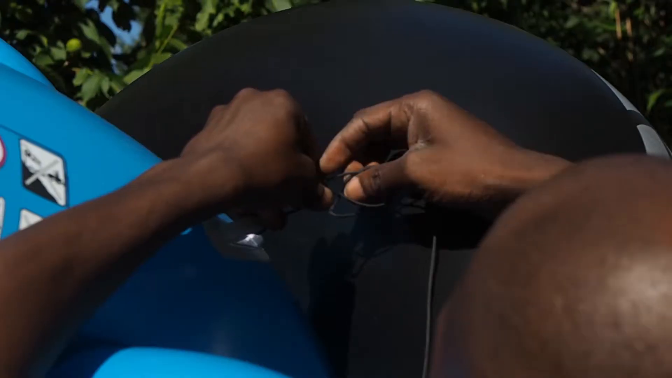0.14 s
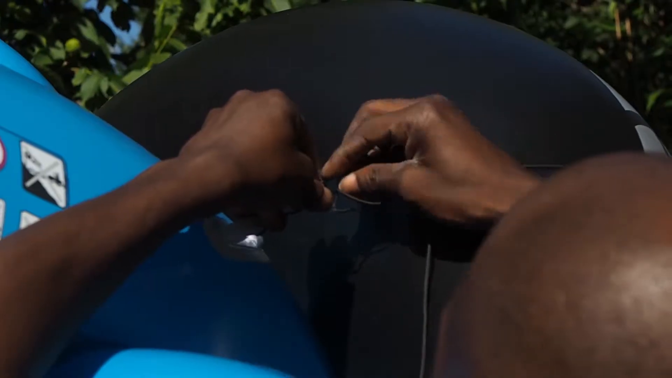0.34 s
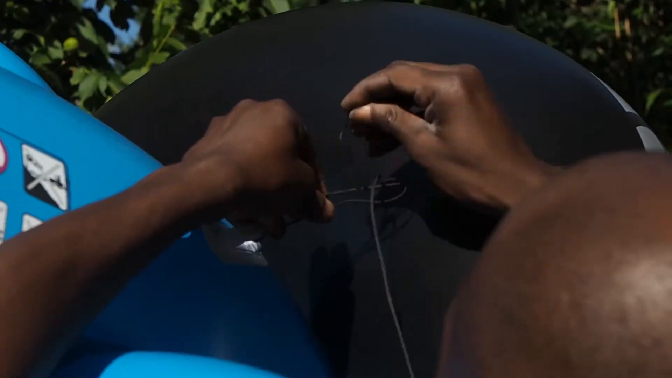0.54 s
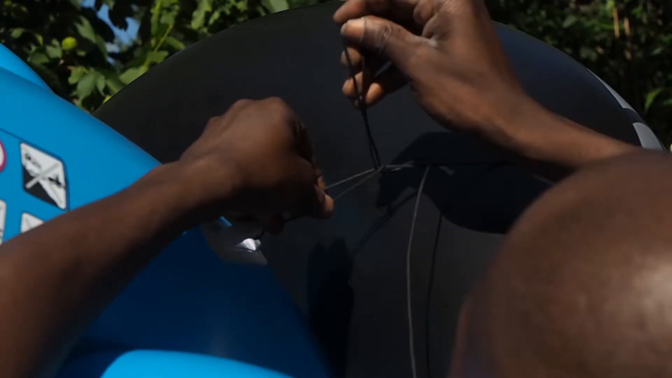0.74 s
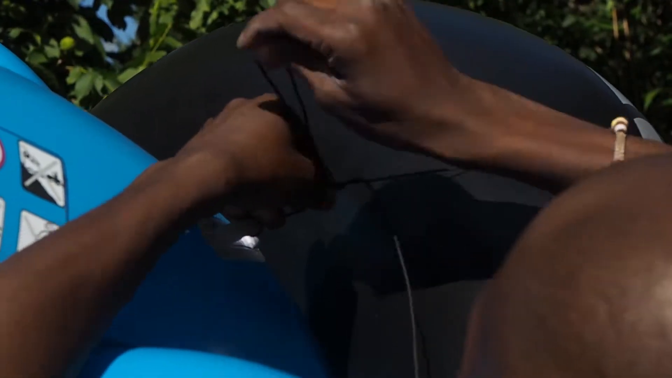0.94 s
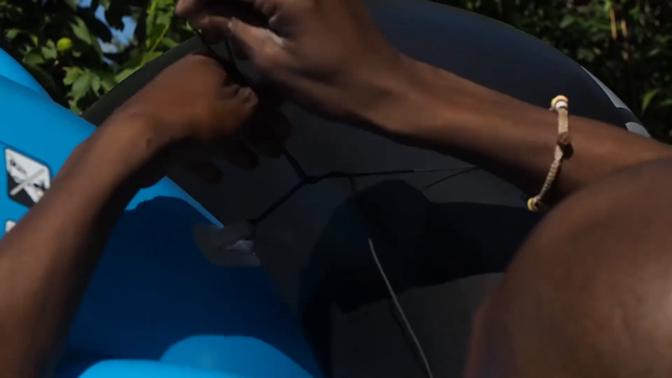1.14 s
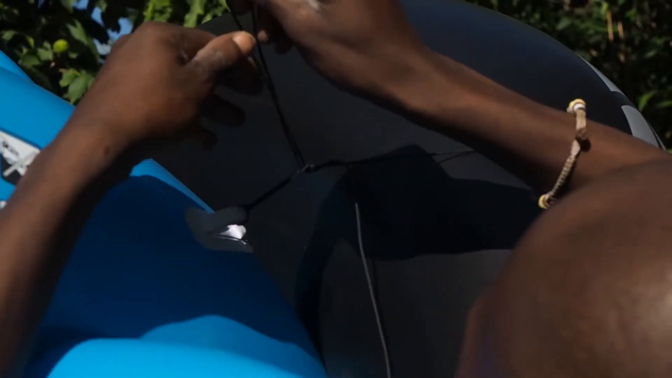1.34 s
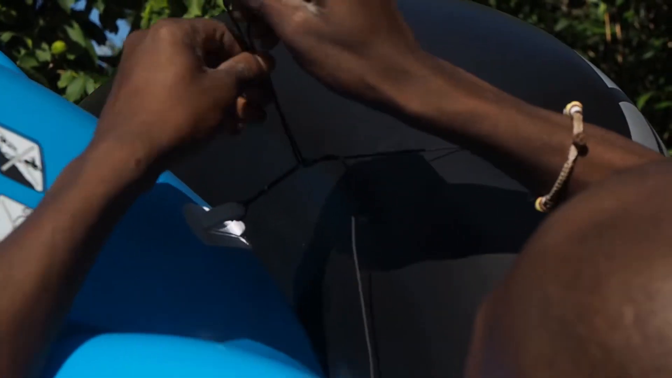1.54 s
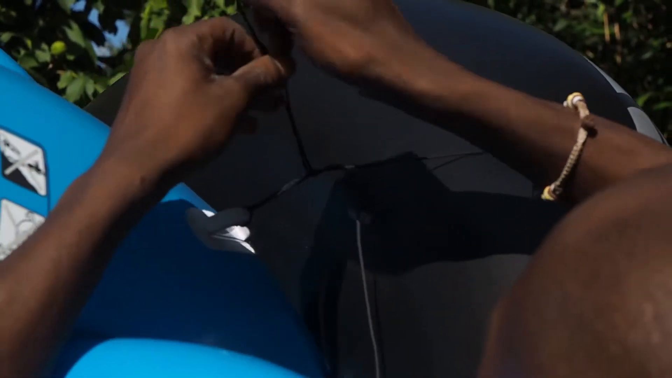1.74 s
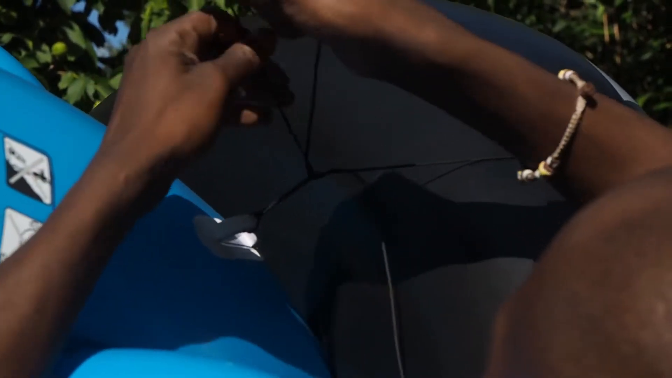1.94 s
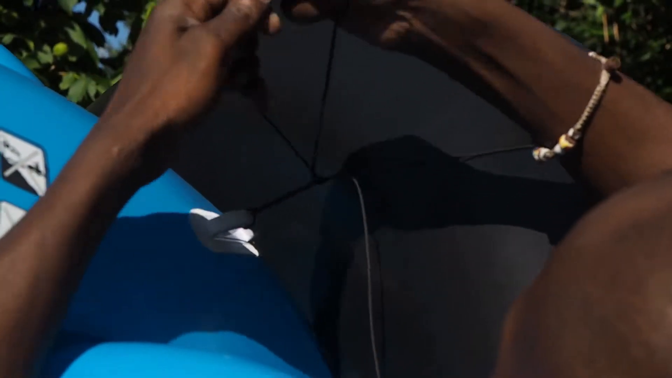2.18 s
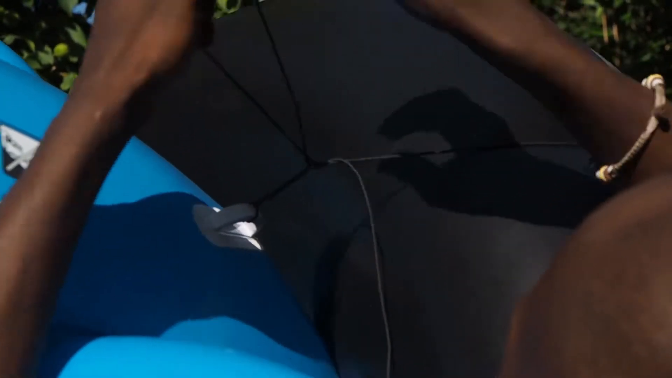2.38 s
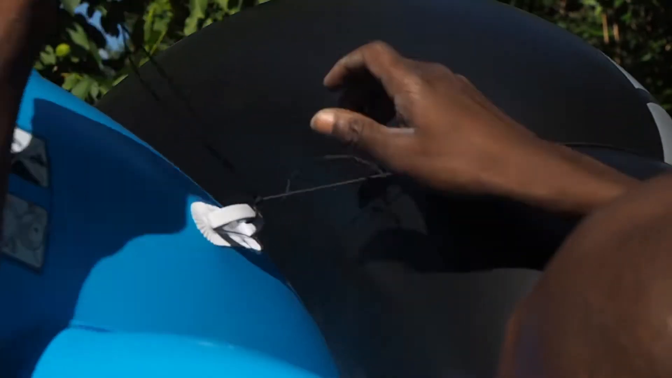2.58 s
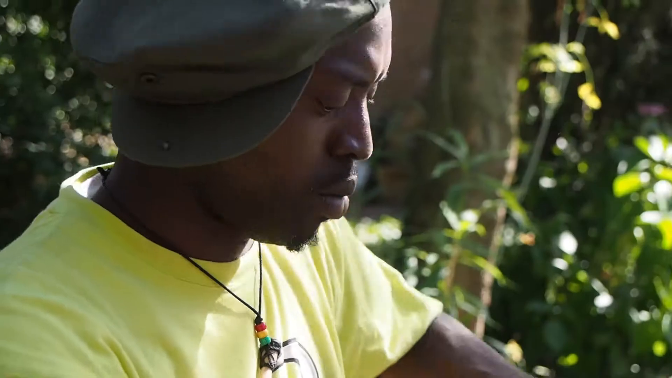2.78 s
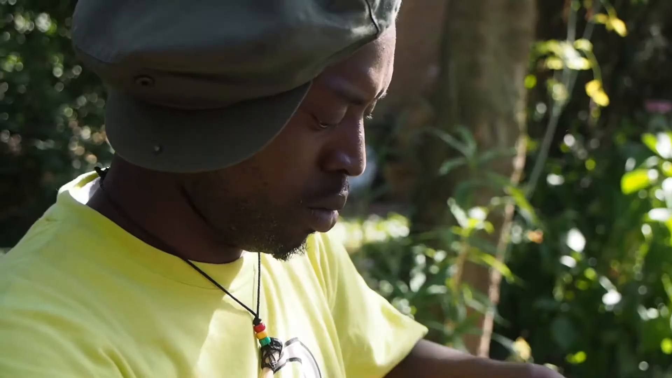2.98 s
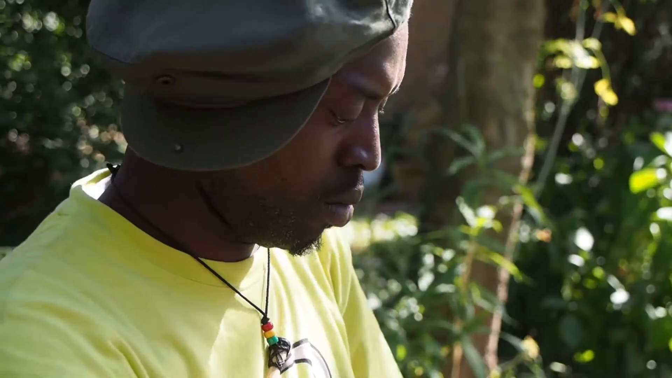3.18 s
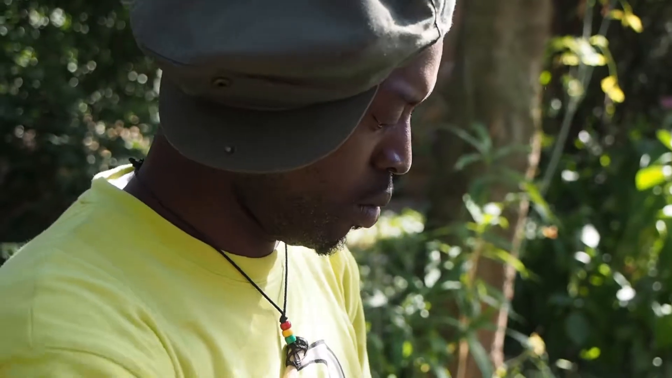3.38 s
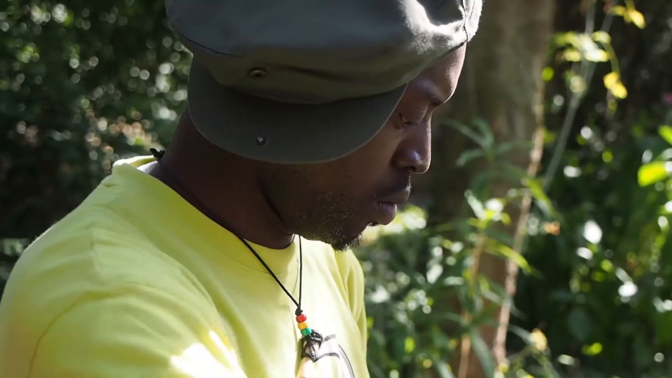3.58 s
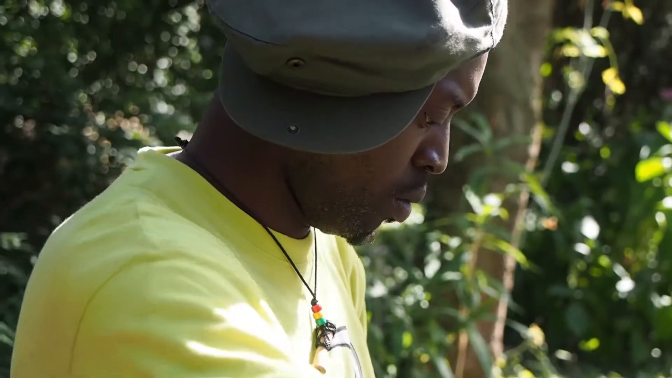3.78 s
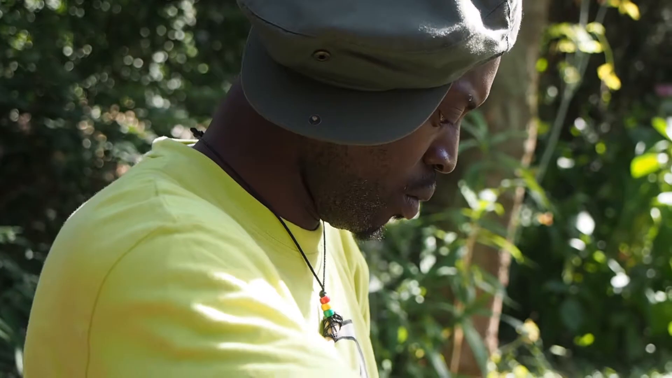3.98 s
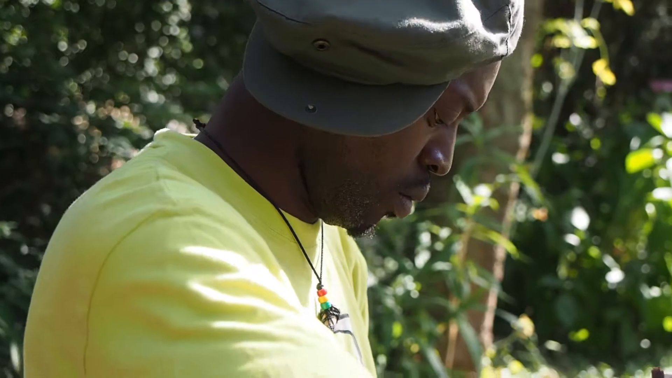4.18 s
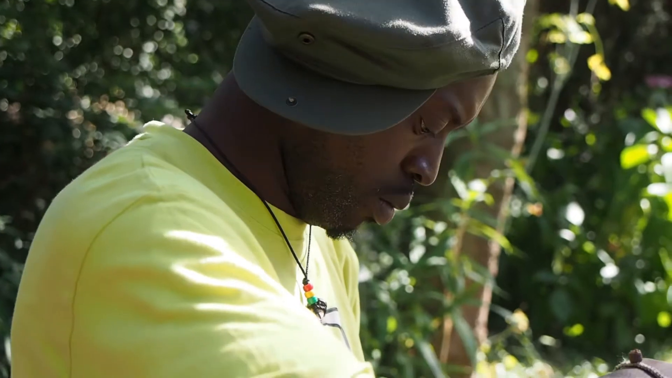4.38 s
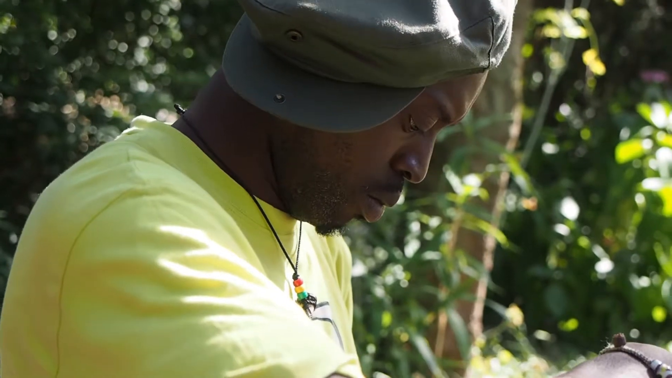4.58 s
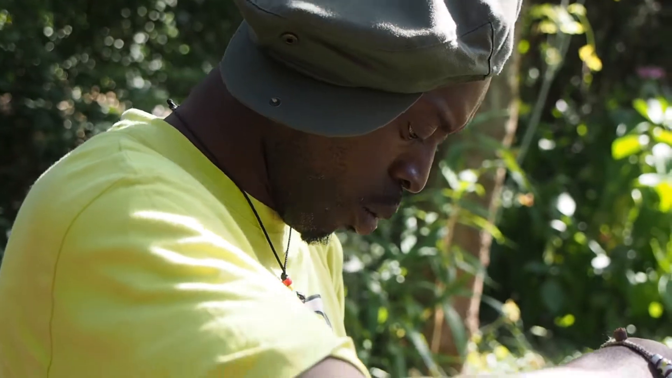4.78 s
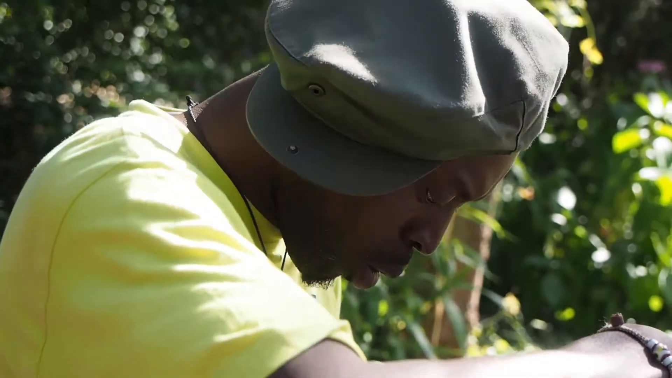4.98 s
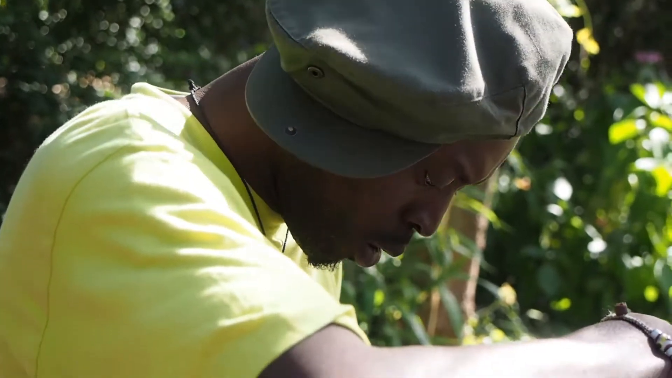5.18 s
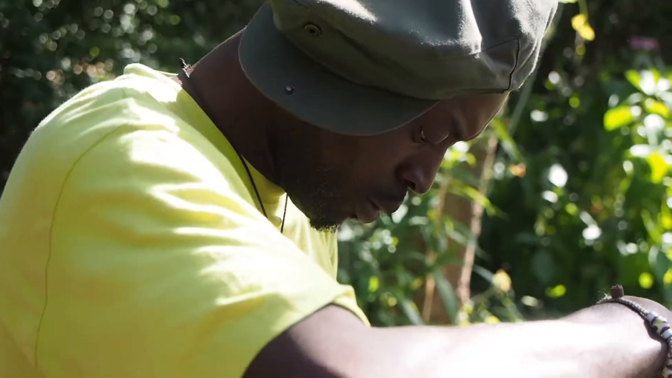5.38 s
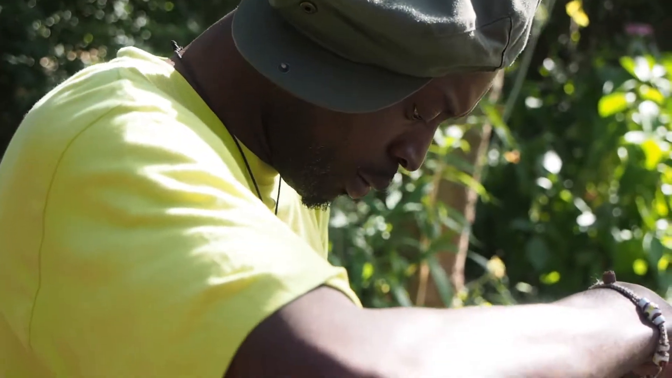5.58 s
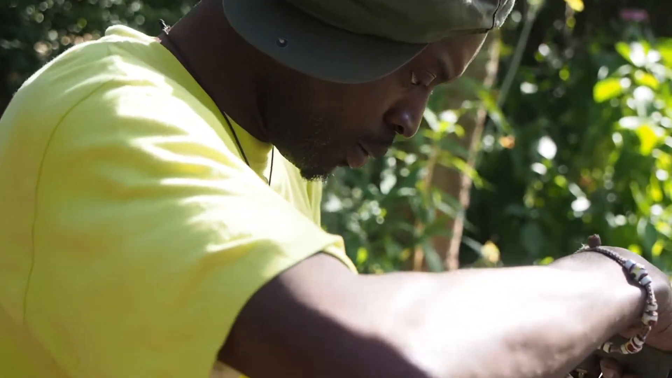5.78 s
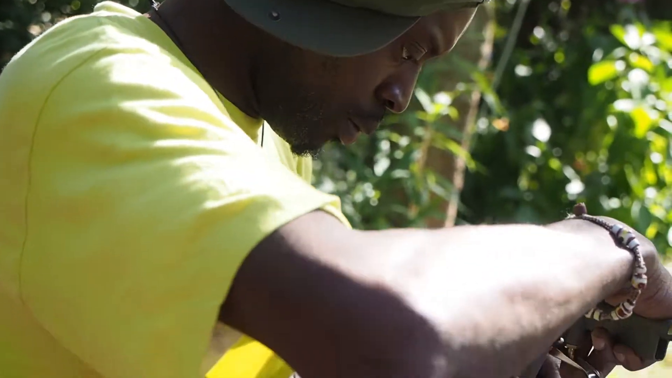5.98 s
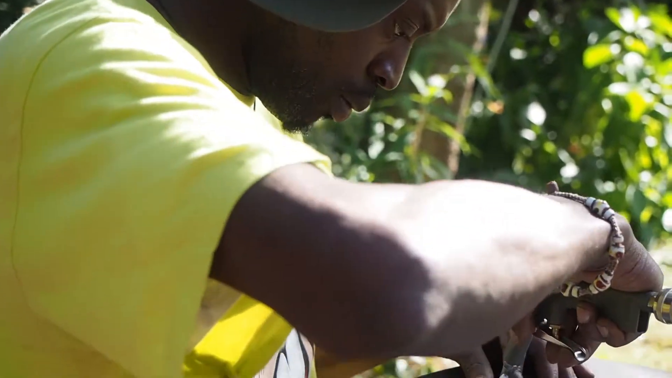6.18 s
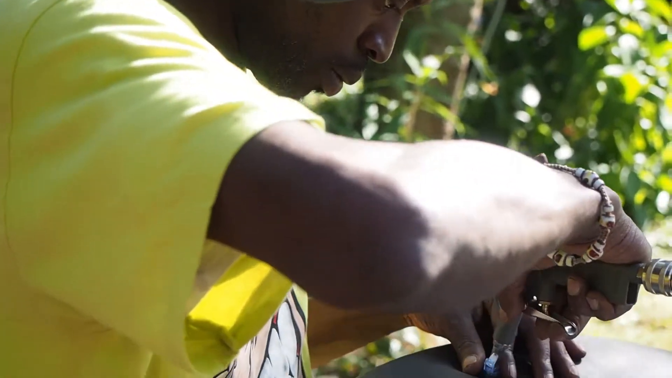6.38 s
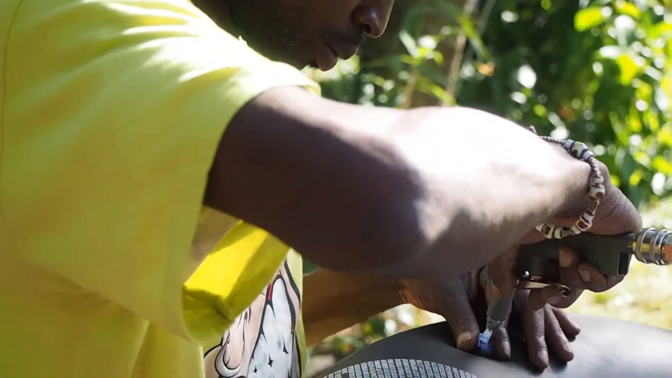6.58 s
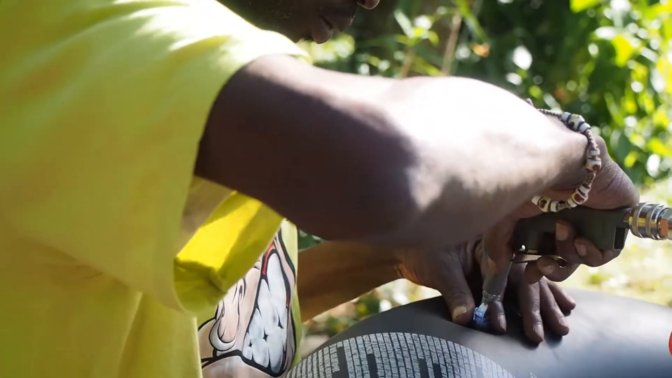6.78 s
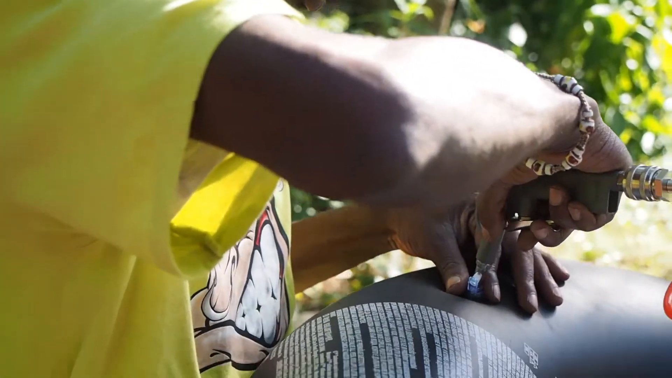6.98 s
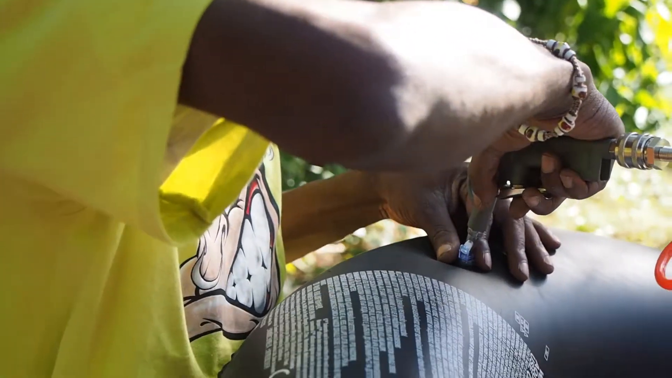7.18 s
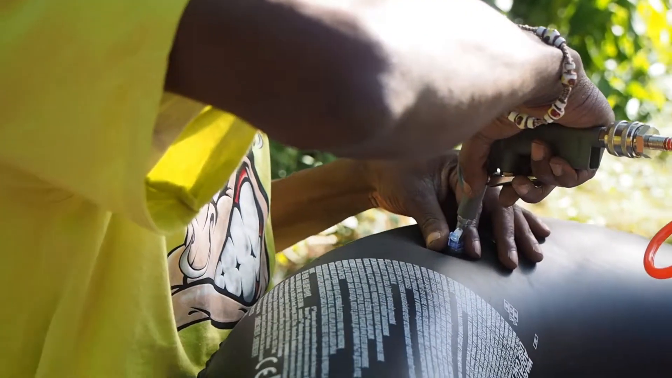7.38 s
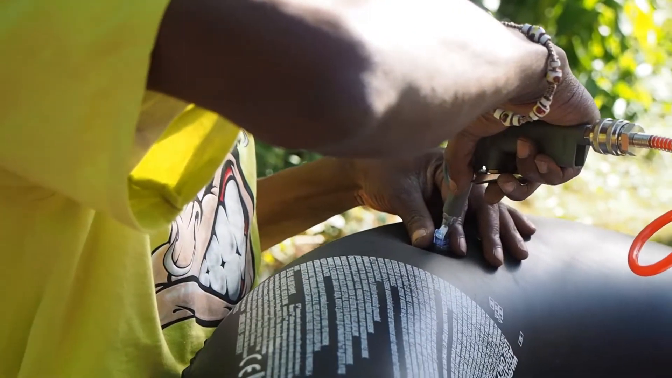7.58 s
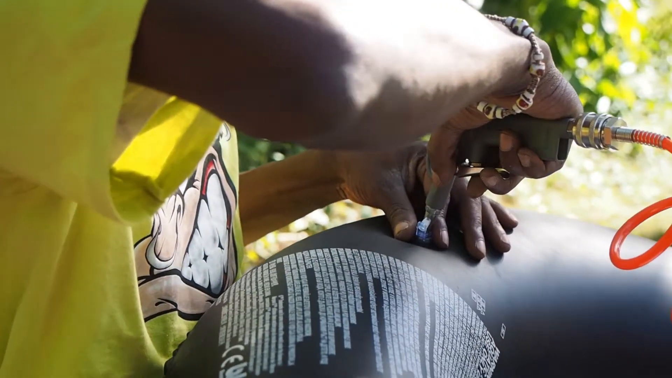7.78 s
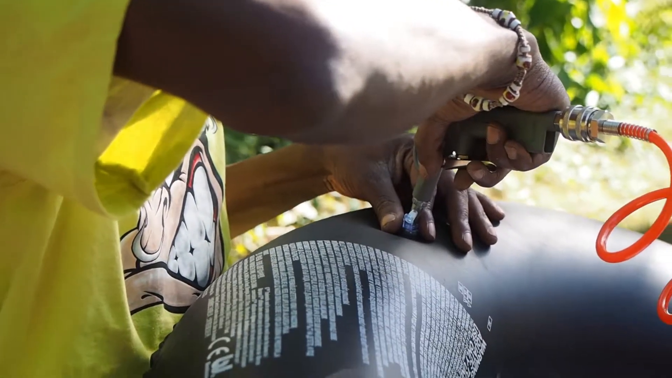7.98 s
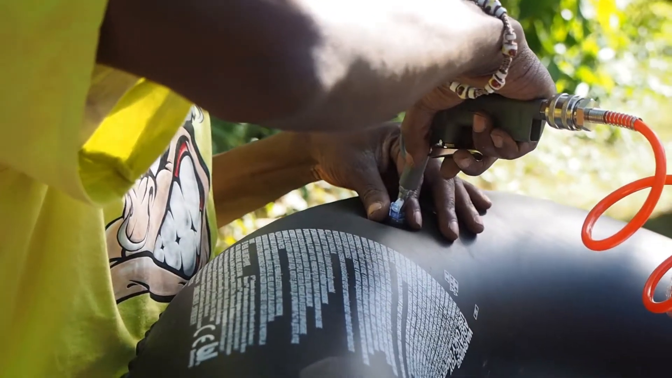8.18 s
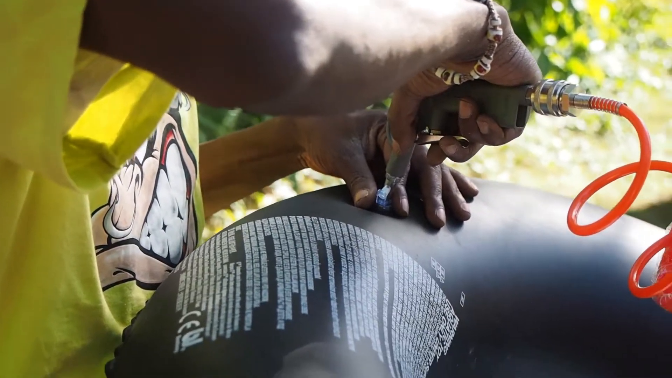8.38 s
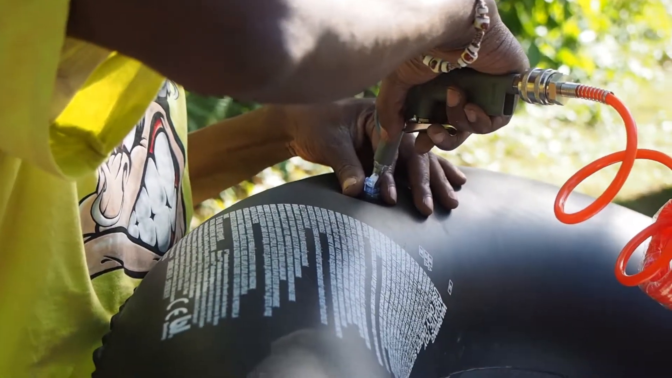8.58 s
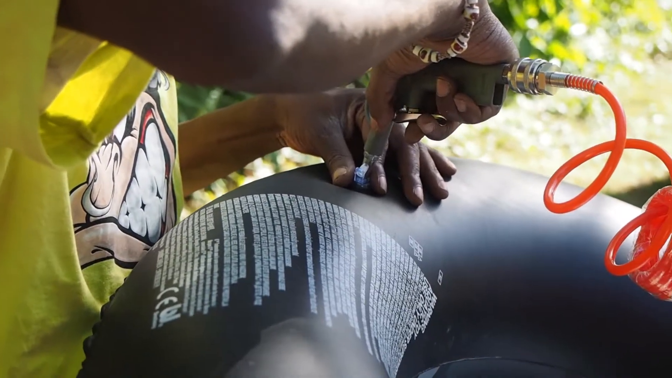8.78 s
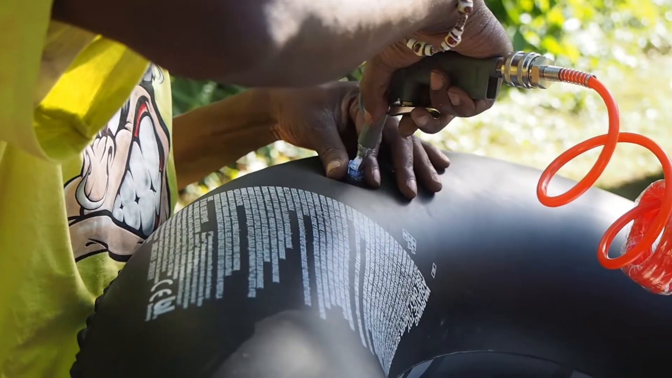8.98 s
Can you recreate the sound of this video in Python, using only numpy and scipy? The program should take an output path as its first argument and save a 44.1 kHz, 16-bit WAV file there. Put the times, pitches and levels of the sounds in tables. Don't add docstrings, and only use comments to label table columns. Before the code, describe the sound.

A small air compressor buzzes and rattles steadily outdoors with soft knocks on rubber, then a loud jet of air hisses into an inflatable tube.

```python
import sys
import numpy as np
from scipy import signal
from scipy.fft import rfft, irfft, next_fast_len
from scipy.io import wavfile
from scipy.ndimage import uniform_filter1d

SR = 44100
rng = np.random.default_rng(int(sys.argv[2]) if len(sys.argv) > 2 else 0)


def amplitude_ratio(level_db):
    exponent = np.asarray(level_db, float) / 20
    return 10 ** exponent


def master_out(mix):
    frames = np.transpose(np.atleast_2d(mix))
    ceiling = np.clip(frames, -1, 1)
    pcm = np.round(ceiling * 32767).astype(np.int16)
    wavfile.write(sys.argv[1], SR, pcm)


N = 398223
T = np.arange(N) / SR
SIZE = next_fast_len(N)
HZ = np.fft.rfftfreq(SIZE, 1 / SR)
MOVE_S = 2.858


def evened(x):
    return x / np.sqrt(np.mean(x ** 2) + 1e-20)


def steadied(x):
    return x / np.sqrt(abs(uniform_filter1d(x ** 2, size=8192)) + 1e-12)


def read(points, hz):
    f, value = np.transpose(points)
    return np.interp(np.log(hz + 1), np.log(f + 1), value)


def curve(rows, column):
    rows = np.array(rows)
    return np.interp(T, rows[:, 0], rows[:, column])


def band_rms(x, lo_hz, hi_hz):
    band = rfft(x, SIZE)[(HZ > lo_hz) & (HZ < hi_hz)]
    return np.sqrt(2 * np.sum(abs(band) ** 2) / SIZE / N)


def filtered(x, gain):
    return irfft(rfft(x, SIZE) * gain, SIZE)[:N]


def coloured(x, points):
    return filtered(x, amplitude_ratio(read(points, HZ)))


def humps(peaks, hz):
    return sum(amplitude_ratio(2 * db) / (1 + (2 * (hz - f) / width) ** 2) for f, width, db in peaks)


def slow(hz):
    lowpass = signal.butter(1, hz, fs=1000, output="sos")
    steps = signal.sosfilt(lowpass, rng.standard_normal(11000))[1000:]
    return np.interp(T * 1000, np.arange(len(steps)), evened(steps))


def blurred(x, bins, frames):
    return evened(uniform_filter1d(uniform_filter1d(x, size=bins, axis=0), size=frames, axis=1))


def noise(field_db, patchy_db, ridges_db):
    frames, hz = N // 256 + 6, np.fft.rfftfreq(1024, 1 / SR)
    a, b, patches, ridges = rng.standard_normal((frames, 513, 4)).T
    level_db = field_db(hz[:, None], np.arange(frames) * 256 / SR)
    level_db = level_db + patchy_db * blurred(patches, 10, 12) + ridges_db * blurred(ridges, 3, 120)
    return signal.istft((a + 1j * b) * amplitude_ratio(level_db), nperseg=1024, noverlap=768)[1][:N]


def flat_db(hz, s):
    return 0 * hz * s


def creeping(train, make):
    shares = (np.sqrt(2 / 3) * np.cos(np.pi * (0.035 * T + k / 3)) for k in range(3))
    return sum(signal.oaconvolve(train * share, make())[:N] for share in shares)


# start_s, nearness_db to the pump, open_view_db of the escaping air
LISTENER = [(0, -0.5, .5), (.7, -0.5, -0.5), (1.4, 0, -0.5), (2.1, -1, -1.5), (2.5, -1.5, -4.5),
            (2.85, -2, -3), (2.86, 0.5, -2), (3.3, .3, -1.5), (3.9, -1.2, -0.5), (4.7, -2.5, 0.5),
            (5.1, -3, -6.5), (5.6, -4, -4.5), (6, -4.5, -5.5), (6.44, -4, -5.5)]


def heard_db(layer, spot, column=1):
    level_db, share = layer[spot]
    return level_db + share * curve(LISTENER, column)


# start_s, speed_strokes_per_s
SHAFT_SPEED = [(0, 46.795), (3, 46.799), (4.2, 46.812), (5, 46.78), (6.4, 46.72), (7.5, 46.768),
               (9.03, 46.788)]


def shaft():
    return 0.016 + np.cumsum(curve(SHAFT_SPEED, 1)) / SR


# hum_wobble_db, loose share of slap (0-1), loose share of
# bounces (0-1), repeated share of casing (0-1), buzz_db of the reed, rush_db of low fan under the hum
STROKE = [
    (-0.5, 0, 0.7, 0.82, -11, -9),
    (0.08, 0.45, 0.35, 1, -6, -13.5),
]
# level_db, share of the listener's move
HUM = [(-28, 0.9), (-19.5, 0.68)]
ORDER_DB = [
    [-28, -14, -21, -6, -15, -12, -10, -8, -6, -13, -6, -1, -5, -4, -9, 0, -15, -8, -6, -6, -8, -17, -8, -8],
    [-41, -22, -34, -15, -28, -29, -22, -14, -13, -14, -12, 0, -9, -10, -6, -8, -19, -24, -16, -19, -15,
     -25, -18, -18],
]
FILLING_DB = {1: 7, 2: 2, 3: 6, 4: 2, 5: 5, 8: -3, 9: 2, 10: 6, 11: -9, 13: 7, 14: -3, 15: 3, 20: -4, 23: 4}
PULSE = [(0, .28, -.04, 25), (.4, .36, -.025, 15)]


def hum(spot):
    fill_s, fill_takes_s = 3.32, 2
    lead, change, bend, null = PULSE[spot]
    wobble_db = STROKE[spot][0]
    turns = shaft() + lead
    full = np.clip((T - fill_s) / fill_takes_s, 0, 1)
    orders = np.zeros(N)
    for k, db in enumerate(ORDER_DB[spot], 1):
        level_db = db + full * FILLING_DB.get(k, 0) + wobble_db * slow(2.9)
        smear = change * (k - 12) ** 2 / 2 + bend * (k - 12) ** 3 / 6
        flip = (k >= null) / 2
        orders += amplitude_ratio(level_db) * np.cos(2 * np.pi * (k * turns + smear + flip))
    return amplitude_ratio(heard_db(HUM, spot) - 1.4) * orders / band_rms(orders, 350, 800)


def slaps():
    behind_ms = (13.1, 13.6)
    full_s, earlier_ms_per_s = (4.8, 6.5), 1.25
    lag_ms = np.where(T < MOVE_S, *behind_ms)
    lag_ms = lag_ms - earlier_ms_per_s * (np.clip(T, *full_s) - full_s[0])
    turns = shaft() - curve(SHAFT_SPEED, 1) * lag_ms / 1000
    at = np.interp(np.arange(np.ceil(turns[-1]) - 1), turns, np.arange(N))
    at = at + 0.28 * rng.standard_normal(len(at))
    near = at.astype(int)[:, None] + np.arange(-16, 17)
    train = np.zeros(N + 40)
    np.add.at(train, near, np.sinc(near - at[:, None]) * np.hanning(33))
    return train[:N]


# first_ms, loudest_ms, loudest_db, rise_db_per_ms, fall_db_per_ms
REBOUND = [(4.4, 7.3, -6.5, 3.5, 1.85), (4.5, 7.5, -5.5, 2.7, 0.7)]


def rebounds(spot, count=12):
    last_ms, uneven_ms = 19.4, 0.28
    first, top, top_db, rise, fall = REBOUND[spot]
    ms = np.linspace(first, last_ms, count) + uneven_ms * rng.standard_normal(count)
    return list(zip(ms, top_db - np.maximum(rise * (top - ms), fall * (ms - top))))


# pitch_hz, level_db, t60_s
REED = [(7300, -12, .012), (7770, -3, .012), (8050, -3, .012), (8530, -3, .01), (8950, -1, .012),
        (9250, 0, .012), (9550, -4, .012), (10080, -1, .014), (10500, -4, .012), (11000, -9, .01),
        (13500, -5, .008)]


def reed_ring(bounces, top_db):
    t = np.arange(1800) / SR
    hz, mode_db, t60 = np.transpose(REED)[:, :, None]
    out = np.zeros((len(REED), len(t)))
    for ms, db in bounces:
        age = np.maximum(t - ms / 1000, 0)
        fade = amplitude_ratio(db + mode_db + top_db * (hz > 12000) - 60 * age / t60)
        onset = 1 - np.exp(-(age / .00022) ** 2)
        out += fade * onset * np.cos(2 * np.pi * (hz * t + rng.random(hz.shape)))
    return out.sum(0)


# start_ms, level_db
SLAP = [
    [(0, 0), (.7, -2), (1.8, -3)],
    [(0, 0), (.9, -3), (1.7, -3)],
]
# level_db, share of the listener's move
VALVE = [(-22, 1.4), (-24.5, 1.08)]
# level_db, share of the listener's move
SLAP_OVER = [(-6.5, -.6), (-.5, 1.8)]


def valve(spot, train):
    _, loose_slap, loose_bounce, _, buzz_db, _ = STROKE[spot]
    colour = [(6500, -36)] + [row[:2] for row in REED[:-1]]
    colour += [(11800, -17.5), (13500, -23), (15000, -36)]

    def contact(bounces, loose, top_db):
        alike = creeping(train, lambda: reed_ring(bounces, top_db))
        swell = np.sqrt(abs(uniform_filter1d(alike ** 2, size=24)))
        fresh = evened(coloured(swell * rng.standard_normal(N), colour)) * np.std(alike)
        return np.sqrt(1 - min(loose, 1) ** 2) * alike + loose * fresh

    slap = contact(SLAP[spot], loose_slap, -1.2)
    chatter = contact(rebounds(spot), loose_bounce, -6)
    clatter = steadied(amplitude_ratio(heard_db(SLAP_OVER, spot)) * slap + chatter)
    buzz = amplitude_ratio(buzz_db) * evened(coloured(rng.standard_normal(N), colour))
    return amplitude_ratio(heard_db(VALVE, spot) + 2) * (clatter + buzz)


# pitch_hz, width_hz, level_db
CASING = [
    [(1630, 290, 0), (2020, 30, -3), (2630, 57, -2), (2900, 64, -6), (4440, 81, -9), (5440, 79, -7),
     (6700, 25, -7)],
    [(1500, 450, -8), (1850, 70, -4), (2030, 60, 0), (2450, 90, -10), (2900, 120, -11), (3800, 250, -12),
     (4280, 250, -14), (5700, 200, -16)],
]
# level_db, share of the listener's move
SHEET = [(-30, 0.97), (-36, 0.63)]


def casing(spot, train):
    tank_hz, tank_width_hz, tank_db = 2030, 70, -2
    tank_s, tank_takes_s = 4.4, 1.1
    t, alike = np.arange(1900) / SR, np.clip(STROKE[spot][3], 0, 1)
    shake = evened(creeping(train, lambda: rng.standard_normal(len(t)) * np.exp(-t / 0.0078)))
    shake = alike * shake + np.sqrt(1 - alike ** 2) * rng.standard_normal(N)
    ring = steadied(filtered(shake, humps(CASING[spot], HZ) ** 0.57))
    wall = steadied(evened(filtered(shake, humps([(tank_hz, tank_width_hz, 0)], HZ))))
    ring += amplitude_ratio(tank_db) * np.clip((T - tank_s) / tank_takes_s, 0, 1) * wall
    return amplitude_ratio(heard_db(SHEET, spot)) * ring


# pitch_hz, level_db per Hz
FAN = [
    [(15, -64), (25, -54), (85, -11), (133, -23), (181, -15), (235, -16), (413, -9.5), (465, -4),
     (562, -5.5), (1190, -8.5), (1700, -4.5), (2600, -16.5), (3370, -18.5), (7000, -16.5), (9100, -25),
     (15400, -120)],
    [(15, -72), (25, -70), (85, -28), (133, -37), (181, -30), (277, -27), (404, -24), (511, -14.5),
     (562, -17.5), (711, -14.5), (850, -24), (1350, -17), (2040, -17), (2200, -24.5), (3290, -19.5),
     (7000, -20), (9100, -80), (15400, -120)],
]
# pitch_hz, level_db
LEAK_COLOUR = [(6000, -34), (8000, 9), (11000, 7), (12500, -1), (14000, 2.5), (16000, -6)]
# level_db, share of the open view
HISS = [(-36, 0.93), (-36, 0.99)]
# level_db, share of the open view
LEAK = [(-43, 0.15), (-37.5, 1.2)]


def fan(spot):
    seen_s, turn_s, hidden_db = 3.36, .3, -9
    rush = coloured(noise(flat_db, patchy_db=0.07, ridges_db=2.0), FAN[spot])
    low = coloured(rush, [(40, -14), (80, 0), (2500, 0), (3400, -30)])
    high = coloured(rush, [(1700, -30), (2500, 0)])
    leak = coloured(noise(flat_db, patchy_db=1.0, ridges_db=-1.0), LEAK_COLOUR)
    low *= amplitude_ratio(heard_db(HUM, spot) + STROKE[spot][5]) / band_rms(low, 290, 1420)
    high *= amplitude_ratio(heard_db(HISS, spot, column=2) - 0.5) / band_rms(high, 3760, 5670)
    shade_db = spot * hidden_db * np.clip((seen_s - T) / turn_s, 0, 1)
    leak *= amplitude_ratio(heard_db(LEAK, spot, column=2) + shade_db) / band_rms(leak, 12300, 15000)
    return low + high + leak


def duck_db():
    duck_s, fall_s, depth_db = 6.485, 0.041, -11
    return depth_db * (1 - np.exp(-np.maximum(T - duck_s, 0) / fall_s))


# pitch_hz, level_db per Hz
JET_COLOUR = [(470, -61), (800, -29), (1110, -25), (1180, -22.5), (1600, -15), (2030, -19), (2300, -14),
              (2800, -13), (3180, -8.5), (3780, -12), (6870, -8), (8700, 0.5), (10600, -13), (13300, -11.5),
              (15600, -19)]
# pitch_hz, width_hz, level_db
JET_WHISTLES = [(1570, 87, -27), (2450, 84, -23.5), (3100, 63, -4), (3537, 17, 0.5), (3900, 110, -12.5),
                (4540, 47, -26), (4960, 200, -9.5), (5970, 33, 2), (6400, 62, -25), (7390, 77, 3),
                (8200, 117, -7), (10900, 120, -24), (13200, 150, -7)]


def jet():
    start_s, rise_s, kick_s = 6.47, .024, .07
    jet_db, kick_db, tilt_db = -13, 4.5, 0.8

    def field_db(hz, t):
        power = amplitude_ratio(2 * read(JET_COLOUR, hz)) + 0.47 * humps(JET_WHISTLES, hz)
        return 10 * np.log10(power) + tilt_db * np.log2((hz + 100) / 8000) + 0 * t

    hiss = noise(field_db, patchy_db=0.93, ridges_db=1.26)
    hiss = hiss * amplitude_ratio(0.21 * slow(30) + 0.15 * slow(9))
    age = np.maximum(T - start_s, 0)
    level_db = jet_db + kick_db * np.exp(-age / kick_s) - duck_db()
    return np.minimum(age / rise_s, 1) ** 2 * amplitude_ratio(level_db) * hiss / band_rms(hiss, 2500, 19000)


# start_s, peak_db, pitch_hz, length_cycles, sign of the push
KNOCKS = [
    (.5565, -18.5, 420, 1.1, 1),
    (.885, -12.5, 760, 4., 1),
    (.896, -15, 850, 3., 1),
    (.97, -20.5, 350, 2.2, 1),
    (.982, -22, 520, 3., 1),
    (1.8245, -9, 400, 1.05, 1),
    (2.2215, -15, 290, 1.05, -1),
    (2.36, -19, 600, 1.1, 1),
    (2.59, -25, 220, 1.2, -1),
    (2.61, -26, 450, 1.5, 1),
]


def knocks():
    out, t = np.zeros(N), np.arange(2000) / SR
    for s, db, hz, cycles, sign in KNOCKS:
        start = round((s - 0.2 / hz) * SR)
        knock = np.sin(2 * np.pi * hz * t) * np.exp(-(t * hz / cycles) ** 2)
        out[start:start + len(t)] += sign * amplitude_ratio(db) * knock
    return coloured(out, [(30, -20), (90, -2), (200, 0)])


# centre_s, half_length_s, level_db over the breeze
GUSTS = [
    (.1, .3, 3),
    (.9, .15, 4),
    (2.1, .5, 8),
    (5, .25, 12),
    (5.8, .6, 24),
]


def wind():
    rumble = coloured(rng.standard_normal(N), [(15, -40), (30, -21), (60, 0), (80, -13), (200, -40)])
    gusts_db = sum(db * np.exp(-((T - s) / half) ** 2) for s, half, db in GUSTS)
    return amplitude_ratio(-79 + gusts_db + 1.5 * slow(5)) * rumble / band_rms(rumble, 30, 75)


def scene():
    train = slaps()
    first, second = (hum(spot) + valve(spot, train) + casing(spot, train) + fan(spot) for spot in range(2))
    moved = np.clip((T - MOVE_S) / .002, 0, 1)
    mix = (1 - moved) * first + moved * second + jet() + knocks() + wind()
    return np.array([mix, mix])


def low_pass(x):
    return signal.sosfilt(signal.butter(12, 15760, fs=SR, output="sos"), x)


def record(dry):
    ducked = dry * amplitude_ratio(duck_db())
    return low_pass(1.069 * np.tanh(ducked / 1.052))


dry = scene()
out = record(dry)
master_out(out)
```